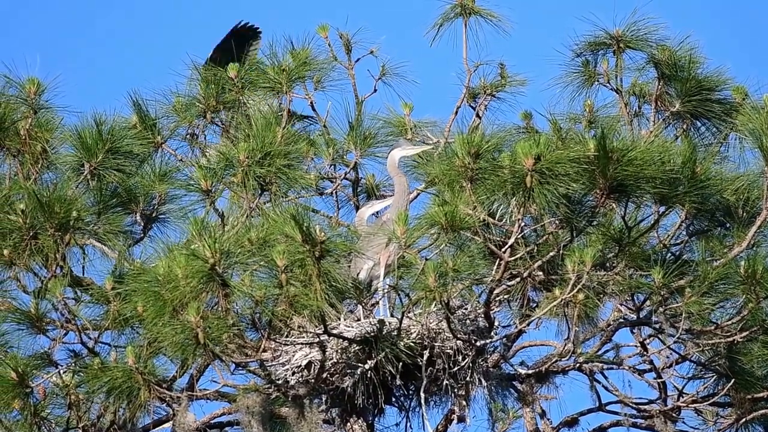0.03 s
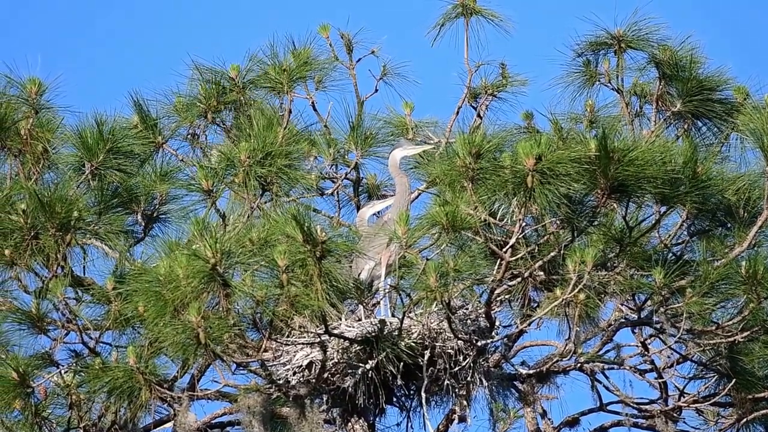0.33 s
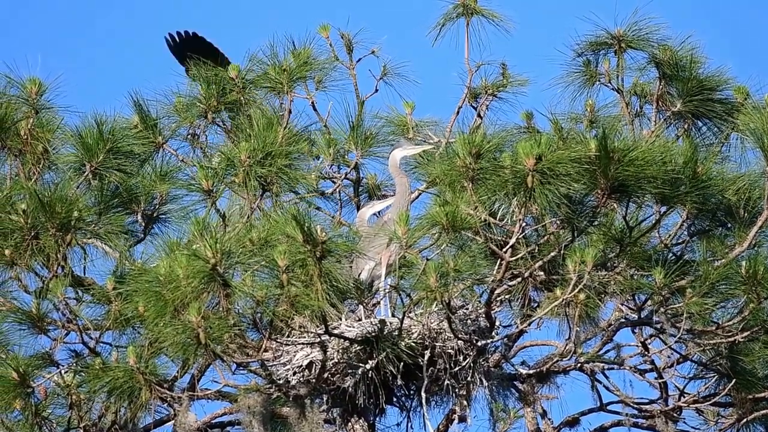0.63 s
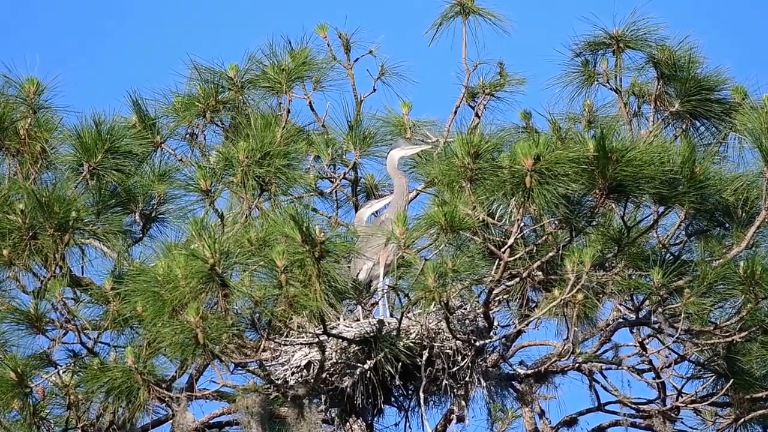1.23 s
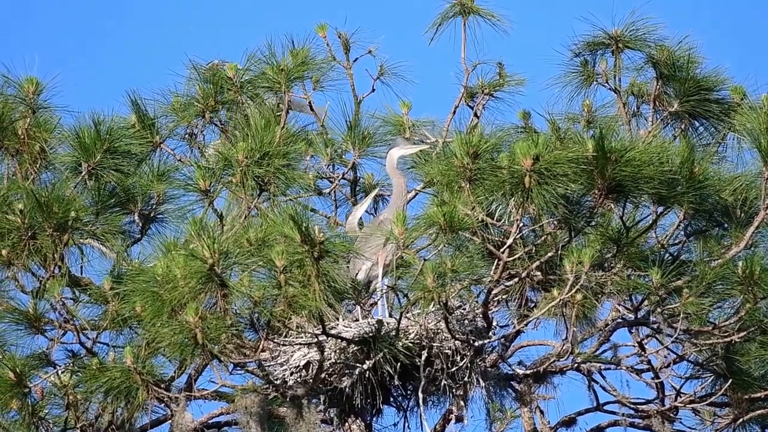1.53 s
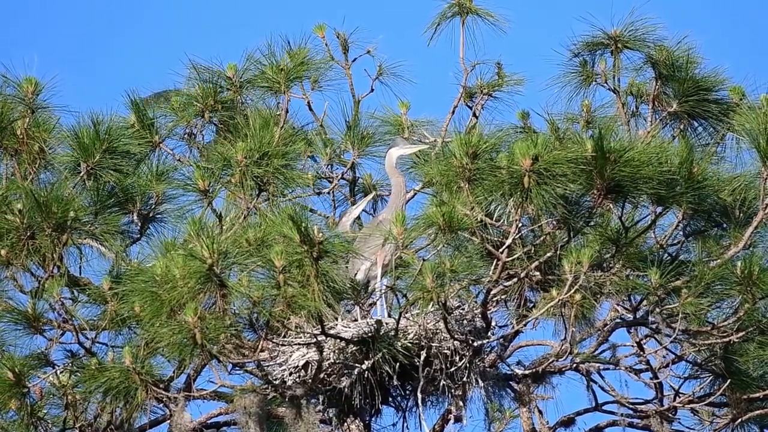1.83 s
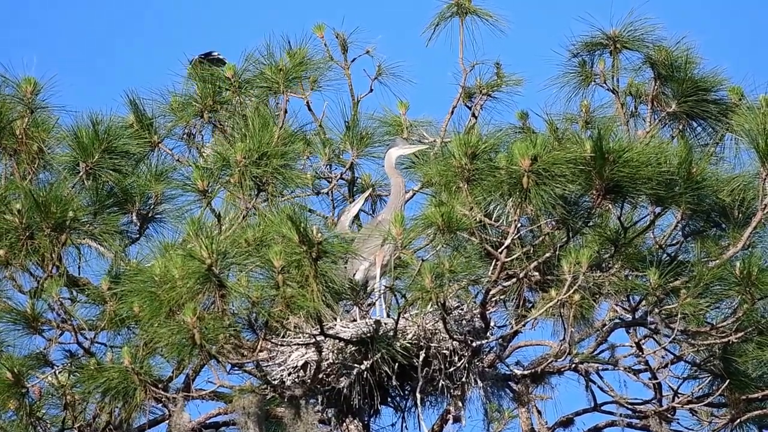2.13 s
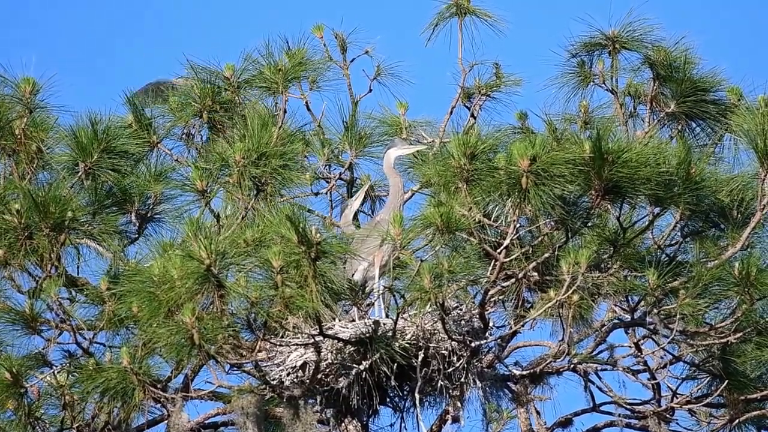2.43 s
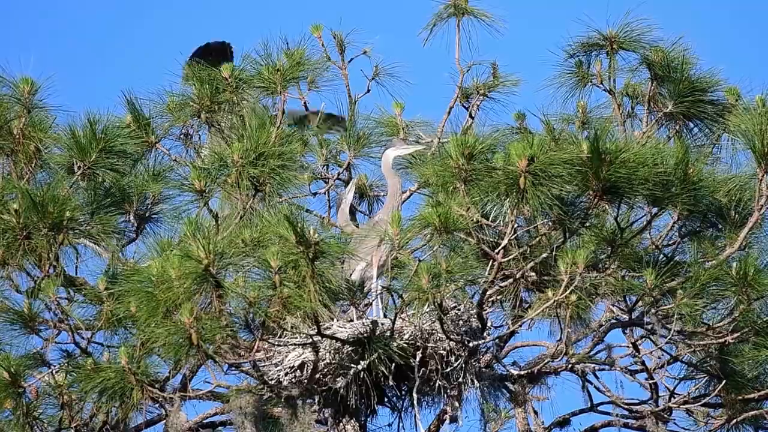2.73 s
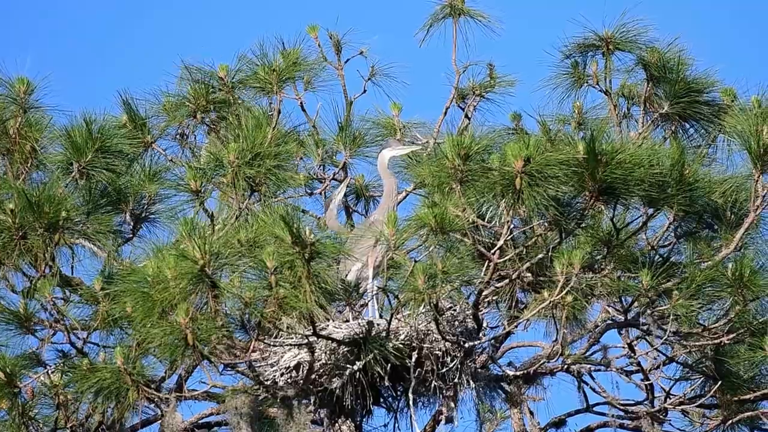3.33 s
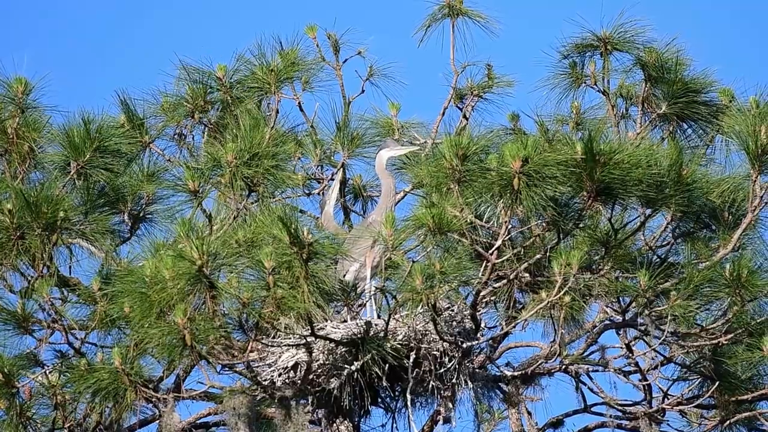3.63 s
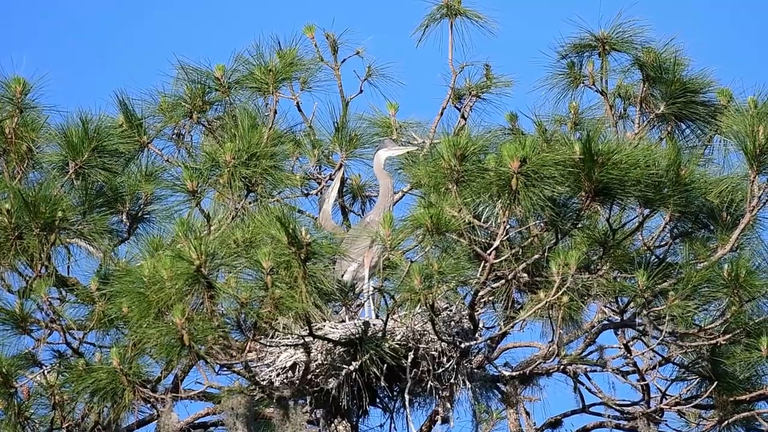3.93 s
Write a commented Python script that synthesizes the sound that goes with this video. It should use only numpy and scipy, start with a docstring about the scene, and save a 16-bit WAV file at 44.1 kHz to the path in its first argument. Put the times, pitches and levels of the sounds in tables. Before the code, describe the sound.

Small birds call softly among pine trees: repeated falling chirps, two high chips and, late on, one rising whistle. Distant traffic rumbles throughout, wind briefly buffets the microphone twice, and a far engine speeds up toward the end.

```python
"""A pine wood, where small birds call: one repeats a falling chirp, another gives two sharp high chips,
a third one rising whistle. Each call is a frequency-swept tone that trunks and needles scatter into a
short tail. Farther birds slur faintly and twigs tick. Distant traffic rumbles as low broadband noise,
and one far engine rises in pitch as it picks up speed. Two low gusts of wind buffet the microphone.
The recorder adds a faint hiss and has two narrow notches in the treble."""
import sys
import numpy as np
from scipy import signal
from scipy.fft import rfft, irfft
from scipy.io import wavfile
from scipy.ndimage import uniform_filter1d

SR = 44100
rng = np.random.default_rng(int(sys.argv[2]) if len(sys.argv) > 2 else 0)


def waveform_to_disk(signal):
    """Save audio, clipped to [-1, 1], as 16-bit WAV at the path in sys.argv[1]."""
    frames = np.transpose(np.atleast_2d(signal))
    scaled = np.clip(frames, -1, 1) * 32767
    samples = np.round(scaled).astype(np.int16)
    wavfile.write(sys.argv[1], SR, samples)


N = 176400


def undb(db):
    """Amplitude ratio for a level in decibels."""
    return 10 ** (np.asarray(db) / 20)


def add(out, start_s, x):
    """Superposition: a sound adds to the track from its start time."""
    i = max(int(start_s * SR), 0)
    out[i:i + len(x)] += x[:max(N - i, 0)]


def noise(spectrum):
    """Spectral shaping: white noise weighted by (frequency_hz, density_db) points, scaled to rms 1."""
    hz, db = np.array(spectrum).T
    f = np.arange(N // 2 + 1) * SR / N + 1
    gain = undb(np.interp(np.log(f), np.log(hz), db)) * np.minimum(f / hz[0], 1)
    x = irfft(rfft(rng.standard_normal(N)) * gain, N)
    return x / x.std()


def drift(rate_hz):
    """Random modulation: smoothed steps with a standard deviation of 1."""
    hold = int(SR / rate_hz)
    steps = np.repeat(rng.standard_normal(N // hold + 1), hold)
    x = uniform_filter1d(uniform_filter1d(steps, hold), hold)[:N]
    return x / x.std()


def pan(db):
    """Level difference between the channels; positive favours the left."""
    return undb(np.array([[db], [-db]]) / 2)


def tone(hz, db, taper=0.11):
    """Frequency modulation: a soft-ended sine whose phase is the integral of its pitch."""
    return undb(db) * np.sin(2 * np.pi * np.cumsum(hz) / SR) * signal.windows.tukey(len(hz), taper)


def tree_echoes(x, t60_s=0.61, trunks_per_s=500, needle_gain=0.7, build_s=0.0055):
    """Scattering: trunks return separate echoes and needles a fine wash, different at each ear."""
    t = np.arange(SR) / SR
    arrivals = rng.random((2, SR)) < trunks_per_s / SR
    trunks = rng.standard_normal((2, SR)) * arrivals * np.sqrt(SR / trunks_per_s)
    needles = needle_gain * rng.standard_normal((2, SR))
    response = (trunks + needles) * np.exp(-np.log(1000) * t / t60_s) * (1 - np.exp(-t / build_s))
    response /= np.sqrt(np.sum(response ** 2, axis=1, keepdims=True))
    return signal.fftconvolve(x[None], response, axes=1)[:, :N]


def from_road(x, lag_s=0.00012):
    """Path difference: road sound reaches the left microphone slightly first."""
    return np.array([x, np.roll(x, int(lag_s * SR))])


# Traffic spectrum common to both ears: frequency_hz, relative_density_db
RUMBLE_COMMON = [(20, -18), (32, -18), (50, -4), (110, 1), (190, -1), (290, -3.5), (420, -11), (700, -15.5),
                 (1050, -16.5), (1500, -23), (2400, -34.5), (4000, -33.5), (6000, -47.5), (9000, -67)]
# Traffic spectrum differing between the ears: frequency_hz, relative_density_db
RUMBLE_SIDE = [(20, -10), (50, 7), (120, 5), (300, -1), (600, -1.5), (1100, -0.5), (1600, -3.5),
               (2500, -13.5), (4000, -34), (6000, -34), (9000, -44)]


def traffic():
    """Partial coherence: a far rumble shared by both ears, widened by weaker noise in antiphase."""
    common = noise(RUMBLE_COMMON) * undb(-42.5 + 0.5 * drift(3))
    side = noise(RUMBLE_SIDE) * undb(-58)
    return from_road(common) + np.array([side, -side])


# Slurs of distant birds: start_s, length_s, from_hz, to_hz, echo_level_db
SLURS = [(.0, 0.067, 2450, 1985, -64), (0.077, 0.072, 1647, 1535, -60.5), (.29, 0.051, 2750, 2000, -65.5),
         (.31, .03, 5600, 4900, -74), (.40, .06, 3200, 3000, -77), (.46, .095, 2540, 1983, -64.5),
         (3.75, .09, 2550, 2040, -70), (3.841, .012, 5580, 4600, -57), (3.937, .01, 7030, 5200, -57),
         (3.991, .008, 6800, 5900, -57)]


def far_birds():
    """Reverberant field: far off, the echoes of these falling slurs outweigh the direct sound."""
    calls = np.zeros(N)
    for start, length, high, low, db in SLURS:
        add(calls, start, tone(np.geomspace(high, low, int(length * SR)), db, taper=0.26))
    return undb(-3) * calls + tree_echoes(calls, t60_s=0.66)


# Dry ticks, as of twigs: start_s, level_db
TICKS = [(.245, -61), (1.985, -61), (1.995, -56.5)]
# Spectrum of a tick: frequency_hz, relative_density_db
TICK_SPECTRUM = [(2000, -22), (4500, 2), (6300, 8.5), (8500, -4), (11000, -2), (13000, -28)]


def twigs(decay_s=0.0034):
    """Damped transients: each tick is a burst of bright noise that decays exponentially."""
    ticks, t = np.zeros(N), np.arange(SR // 20) / SR
    for start, db in TICKS:
        add(ticks, start, undb(db) * noise(TICK_SPECTRUM)[:len(t)] * np.exp(-t / decay_s))
    return ticks + undb(-3) * tree_echoes(ticks, t60_s=0.2)


# Falling chirps: start_s, top_pitch_hz, length_s, direct_level_db, scattered_level_db
CHIRPS = [(0.652, 3984, 0.068, -60, -58), (1.33, 4090, 0.06, -50, -59), (1.574, 4030, 0.065, -64, -58.5),
          (1.788, 4030, 0.061, -63, -59.5), (2.086, 4020, 0.056, -59.5, -59.5),
          (2.418, 3985, .064, -58.5, -58), (2.706, 4070, .070, -59, -55),
          (2.998, 4110, 0.057, -58.5, -57.5), (3.375, 4076, 0.061, -56, -56)]
# Contour of every chirp: length_fraction, pitch_ratio, relative_level_db
CHIRP_CONTOUR = [(0, .68, -5), (.07, .995, -3.5), (.28, 0.98, 0.5), (.52, .92, -3), (0.801, 0.88, -5),
                 (.89, 0.72, -7), (1, .62, -14)]


def chirping_bird(waver_depth=0.012, octave_db=-20):
    """Multipath: near branches roughen each chirp as it flicks up and falls; far trees add a tail."""
    direct, scattered = np.zeros(N), np.zeros(N)
    waver = 1 + waver_depth * drift(250)
    fraction, ratio, contour_db = np.array(CHIRP_CONTOUR).T
    for start, top_hz, length, direct_db, scattered_db in CHIRPS:
        progress = np.linspace(0, 1, int(length * SR))
        hz = top_hz * np.interp(progress, fraction, ratio) * waver[int(start * SR):][:len(progress)]
        effort_db = np.interp(progress, fraction, contour_db)
        call = tone(hz, effort_db, taper=0.026) + tone(2 * hz, 2 * effort_db + octave_db)
        add(direct, start, undb(direct_db) * call)
        add(scattered, start, undb(scattered_db) * call)
    branches = tree_echoes(scattered, t60_s=0.09)
    tail = undb(0.5) * tree_echoes(scattered, t60_s=0.72)
    return direct + (branches + tail) * pan(-1.5)


# Sharp chips: start_s, lowest_hz, highest_hz, level_db
CHIPS = [(1.4215, 5720, 8120, -48), (3.5705, 6093, 8160, -51)]


def chipping_bird(length_s=0.00824, left_lag_s=0.00008):
    """Time spreading: the trees draw a fast up-and-down sweep from the right into a long sizzle."""
    chips, progress = np.zeros(N), np.linspace(0, 1, int(length_s * SR))
    up_and_down = 1 - np.abs(2 * progress - 1)
    for start, low, high, db in CHIPS:
        chip = tone(low + (high - low) * up_and_down, db, taper=0.05)
        band = signal.butter(5, [low, high], "bandpass", fs=SR, output="sos")
        add(chips, start, signal.sosfilt(band, np.pad(chip, (0, len(chip)))))
    direct = np.array([np.roll(chips, int(left_lag_s * SR)), chips]) * pan(-7)
    return direct + undb(9.5) * tree_echoes(chips) * pan(-5)


# Low gusts of wind buffeting the microphone: start_s, length_s, centre_hz, level_db
GUSTS = [(1.551, 0.22, 52, -48), (1.889, 0.14, 111.5, -40)]


def wind_gusts():
    """Turbulent pressure: each gust buffets the microphone with low noise that rises and fades."""
    out = np.zeros(N)
    for start, length, hz, db in GUSTS:
        count = int(length * SR)
        band = noise([(hz / 2, -12), (hz, 0), (2 * hz, -18), (10 * hz, -70)])[:count]
        add(out, start, undb(db) * band * np.hanning(count))
    return out


# Engine picking up speed: time_s, firing_rate_hz, level_db
ENGINE = [(2.35, 100.6, -64), (2.72, 104.8, -48.5), (2.9, 107.6, -41), (3.12, 110.1, -40.5),
          (3.3, 111.9, -37.5), (3.5, 117, -47.5), (3.7, 124, -46), (4, 121, -51)]


def far_engine(wander_depth=0.0061, octave_db=-27.5, flutter_db=0.5):
    """Periodic excitation: the firing rate sets the pitch of a hum with a weak second harmonic."""
    t = np.arange(N) / SR
    times, firing_hz, db = np.array(ENGINE).T
    hz = np.interp(t, times, firing_hz) * (1 + wander_depth * drift(10))
    phase = 2 * np.pi * np.cumsum(hz) / SR
    hum = np.sin(phase) + undb(octave_db) * np.sin(2 * phase)
    return from_road(hum * undb(np.interp(t, times, db) - flutter_db * drift(12)))


def whistling_bird(start_s=3.484, length_s=0.049, from_hz=1220, to_hz=3160):
    """Power-law glide: one pure tone curves upward ever faster as it fades."""
    call, progress = np.zeros(N), np.linspace(0, 1, int(length_s * SR))
    hz = from_hz + (to_hz - from_hz) * progress ** 2.1
    add(call, start_s, tone(hz, db=-51 - 6.5 * progress))
    return call + undb(-18) * tree_echoes(call)


def scene():
    """Superposition: the sound pressures of traffic, birds, twigs and wind add."""
    return (traffic() + far_birds() + twigs() + chirping_bird() + chipping_bird()
            + wind_gusts() + far_engine() + whistling_bird())


# Treble notches of the recorder: centre_hz, single_pass_width_hz
NOTCHES = [(7680, 830), (9600, 640)]


def record(dry, hiss_db=-63.5, cutoff_hz=15750):
    """Self-noise and filtering: hiss in each channel, two deep notches and a steep low-pass."""
    hiss_spectrum = [(1000, 10.5), (6000, 5.5), (8500, -4), (11500, -2), (16000, -6.5)]
    x = dry + undb(hiss_db) * np.array([noise(hiss_spectrum), noise(hiss_spectrum)])
    for hz, width in NOTCHES:
        b, a = signal.iirnotch(hz, hz / width, fs=SR)
        x = signal.lfilter(b, a, signal.lfilter(b, a, x))
    return signal.sosfilt(signal.ellip(12, 0.2, 70, cutoff_hz, fs=SR, output="sos"), x)


dry = scene()
out = record(dry)
waveform_to_disk(out)
```